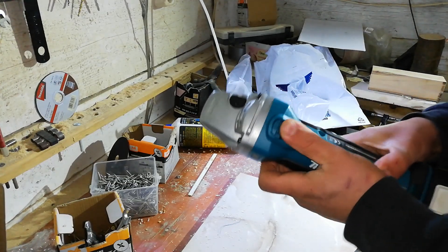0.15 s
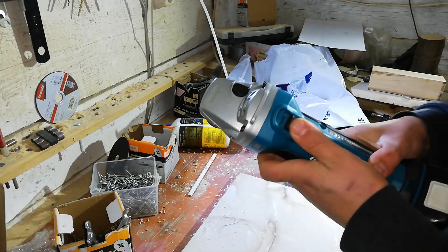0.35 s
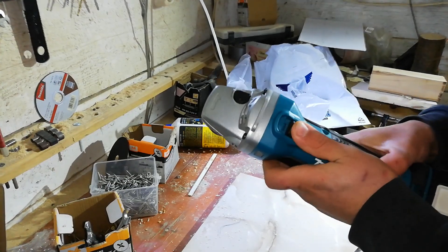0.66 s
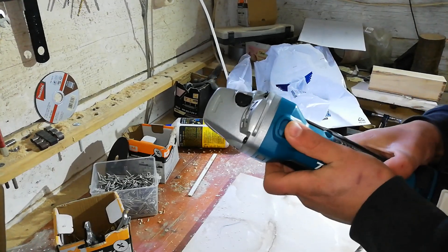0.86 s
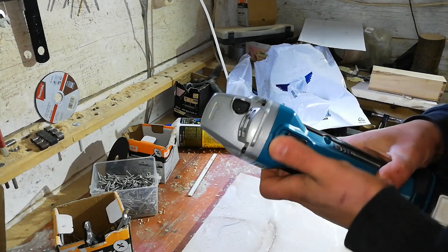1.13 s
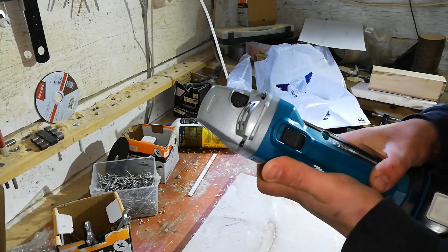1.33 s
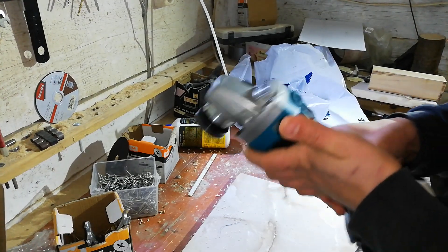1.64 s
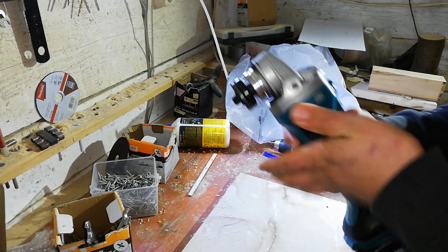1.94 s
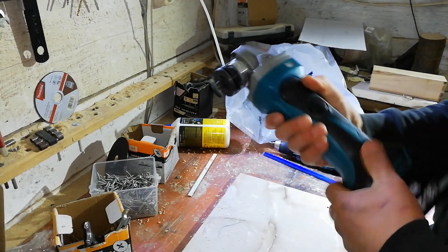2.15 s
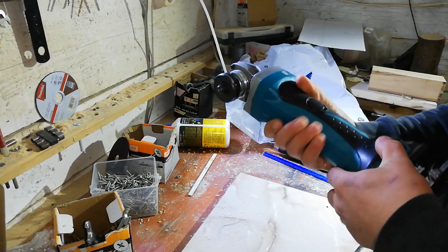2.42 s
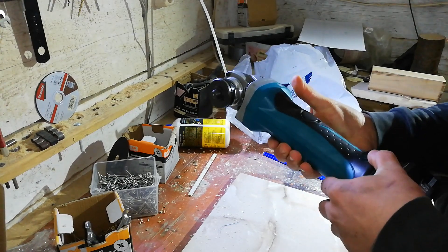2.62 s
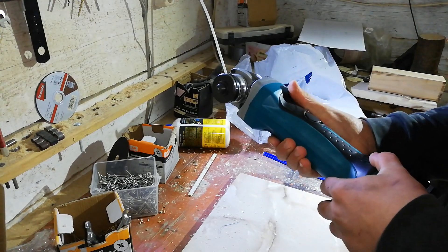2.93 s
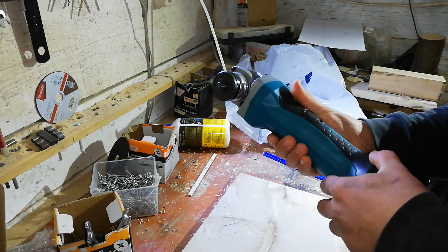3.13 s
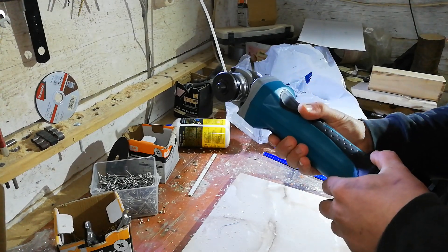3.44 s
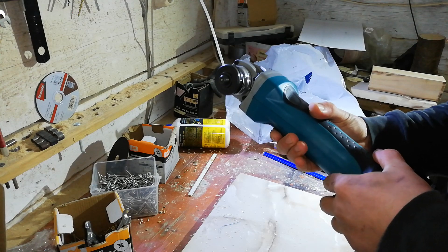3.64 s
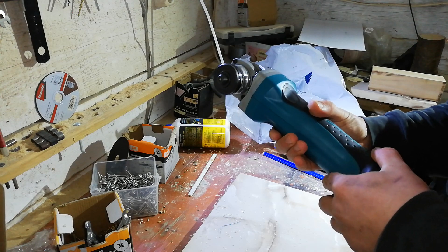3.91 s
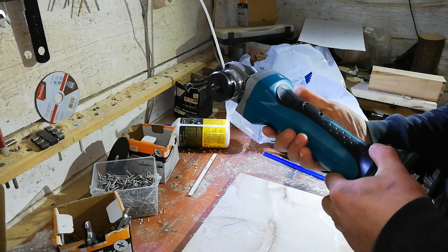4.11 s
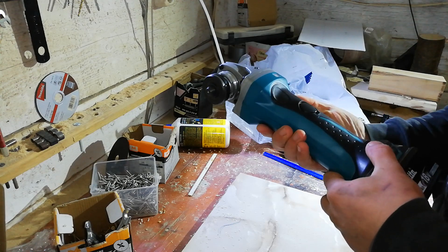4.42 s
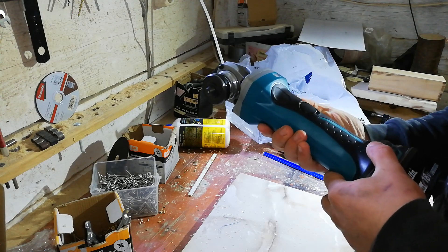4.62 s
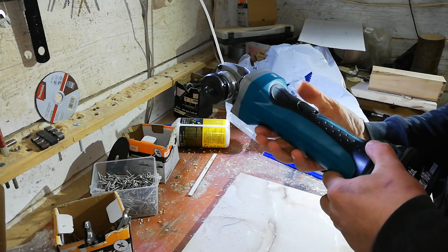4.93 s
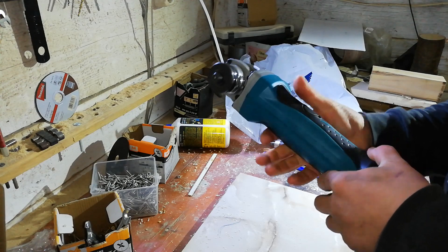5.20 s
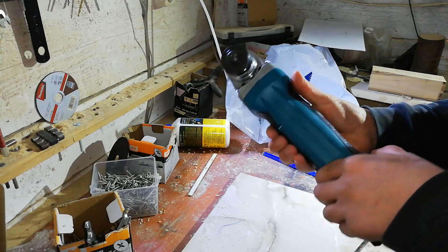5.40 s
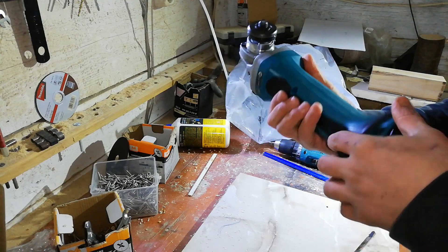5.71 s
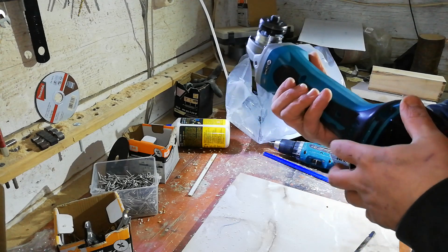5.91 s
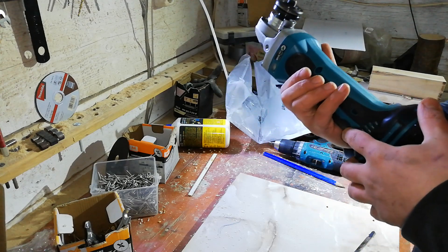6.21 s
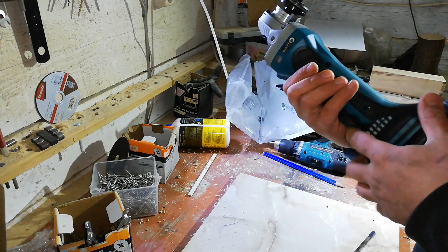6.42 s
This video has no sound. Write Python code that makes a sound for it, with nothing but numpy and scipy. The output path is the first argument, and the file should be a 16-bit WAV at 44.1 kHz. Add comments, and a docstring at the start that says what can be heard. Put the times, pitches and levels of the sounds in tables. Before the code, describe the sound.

A close stereo microphone in a small, cluttered, fairly dry workshop. At first there is only a very low room floor, with faint plastic ticks and soft skin rubs around 0.2-0.4 and again near 0.75 seconds. At 0.8 a sharp, loud switch snap; at 0.9 a short rough electric buzz, and a cordless angle grinder without a disc spins up, its strained gears chirping and screeching upward until about 1.3. It then runs steadily, a bright harsh gear rattle with hum, high whines and fan air; between 1.6 and 2.4 its colour shifts as it is turned over, the hum receding and whine coming forward. Small hard knocks poke through. At 4.86 the switch snaps off. Brief squeals glide down, air fades quickly, and the rattle separates into slower, duller pulses and scraping, ending at 6.2 with a tiny tick and faint metallic ring. Quiet follows, with a faint handling rub and tick near 6.5.

```python
"""A thumb feels for a slide switch in the quiet of a small workshop: ticks in the slot, skin rubbing on plastic.
The switch snaps on, the soft start buzzes and a cordless angle grinder without a disc spins up over a bench.
It whines and is turned over in the hands; bevel gears rattle in the metal head and the fan blows.
Switched off, it coasts to a stop. Filtered noise makes the rattle, air, rubs and clicks; sines that follow
the motor's turns make the hum, the whines, the squeals and the blade tone."""
import sys
import numpy as np
from scipy import signal
from scipy.fft import rfft, irfft, next_fast_len
from scipy.io import wavfile
from scipy.ndimage import uniform_filter1d, map_coordinates

SR = 44100
rng = np.random.default_rng(int(sys.argv[2]) if len(sys.argv) > 2 else 0)


def waveform_to_disk(signal):
    """Save audio, clipped to [-1, 1], as 16-bit WAV at the path in sys.argv[1]."""
    frames = np.transpose(np.atleast_2d(signal))
    scaled = np.clip(frames, -1, 1) * 32767
    samples = np.round(scaled).astype(np.int16)
    wavfile.write(sys.argv[1], SR, samples)


N = 288847

TEETH = 19  # on the motor pinion
GEAR_RATIO = TEETH / 39  # spindle turns for each motor turn
BLADES = 7  # on the fan
FULL_HZ = 327.2  # full speed, motor turns a second
ON_S, SOFT_END_S, OFF_S = .9, 1.03, 4.86  # power on, soft start over, power off

# Likeness of left and right at the microphones. Each row: frequency in Hz, likeness (1 = the same).
ALIKE = [(100, 1), (300, 0.98), (550, 0.89), (1000, 0.46), (2000, 0.83), (4000, 0.44), (9000, 0.074)]
# Resonances of the metal gear head. Each row: centre in Hz, width in Hz, lift in dB.
HEAD = [(1203.5, 20, 9), (1320, 35, 2.5), (1546, 410, 2), (2375, 40, 2.5), (2964, 97, 2.5), (3640, 120, 0),
        (3800, 410, 3), (4830, 800, 3.5), (5430, 80, 6), (8240, 330, 1), (9710, 330, 2.5)]
# Colour of the switch and its housing. Each row: frequency in Hz, relative level in dB.
SWITCH_COLOUR = [(180, -70.5), (300, -42), (526, -50), (922, -19), (1180, -18), (1640, -20), (3280, -12.5),
                 (4200, -16), (5500, -12.5), (6360, -15), (8280, -5.5), (10600, -7.5), (12500, -35),
                 (15500, -35.5)]
# The gears' last tick as they stop. Each row: time in seconds, envelope peak in dB, 60 dB decay in seconds.
LAST_TICK = [(6.2128, -49, .018)]


def amp(db):
    """Decibels to gain."""
    return 10 ** (np.asarray(db) / 20)


def unit(x):
    """x at rms 1."""
    return x / np.sqrt(np.mean(x ** 2) + 1e-20)


def along(points, hz):
    """Values between (Hz, value) points on a log frequency axis."""
    f, v = np.transpose(points)
    return np.interp(np.log(hz + 1), np.log(f + 1), v)


def clock():
    """The time of every sample, in seconds."""
    return np.arange(N) / SR


def curves(rows):
    """One value per sample for each column after the time."""
    s, *cols = np.transpose(rows)
    return [np.interp(clock(), s, c) for c in cols]


def ramp(start, end):
    """0 before start, 1 after end, straight between."""
    return np.clip((clock() - start) / max(end - start, 1 / SR), 0, 1)


def swell(s, length):
    """A smooth rise and fall around time s."""
    return np.exp(-((clock() - s) / length) ** 2)


def strikes(rows):
    """Envelope of sharp contacts that die away, from rows of seconds, peak dB and 60 dB decay in seconds."""
    return sum((clock() >= s) * amp(db - 60 * np.abs(clock() - s) / decay) for s, db, decay in rows)


def wobble(rate):
    """A smooth random curve, rate knots a second."""
    t = clock()
    coarse = t[::32]
    knots = rng.standard_normal(int(N * rate / SR) + 4)
    return np.interp(t, coarse, map_coordinates(knots, [coarse * rate], order=2))


def lift_db(resonances, hz):
    """The lift in dB that a body's resonances give at hz."""
    return sum(db / (1 + (2 * (hz - centre) / width) ** 2) for centre, width, db in resonances)


def filtered(x, response):
    """x times a response of frequency."""
    m = next_fast_len(N + SR // 2)
    return irfft(rfft(x, m) * response(np.fft.rfftfreq(m, 1 / SR)), m)[..., :N]


def coloured(x, colour_db):
    """Causal minimum-phase filter whose shape in dB is a function of frequency, scaled to unit power."""
    size = 4096
    gain = unit(amp(colour_db(np.fft.rfftfreq(size, 1 / SR))))
    cepstrum = irfft(np.log(gain + 1e-6))
    # fold the cepstrum forwards in time so that nothing sounds early
    cepstrum[1:size // 2] *= 2
    cepstrum[size // 2 + 1:] = 0
    impulse = irfft(np.exp(rfft(cepstrum)))
    return signal.fftconvolve(x, impulse[None], axes=1)[:, :N]


def noise(alike):
    """White stereo noise with the given likeness of left and right."""
    def mid_side_gains(hz):
        turn = np.arccos(np.clip(along(alike, hz), -1, 1)) / 2
        return np.array([np.cos(turn), np.sin(turn)])

    mid, side = filtered(rng.standard_normal((2, N)), mid_side_gains)
    return unit(np.array([mid + side, mid - side]))


def patchy(x, depth_db, flares=()):
    """Moving the tool shifts the bench's reflections: patches of gain drift over the spectrum, some bands flare."""
    hz, t, z = signal.stft(x, SR, nperseg=512)
    field = uniform_filter1d(rng.standard_normal(z.shape), size=4, axis=1)
    field = uniform_filter1d(field, size=36, axis=2)
    flare_db = sum(np.outer(lift_db([band], hz), np.exp(-((t - s) / length) ** 2))
                   for s, length, *band in flares)
    return signal.istft(z * amp(depth_db * unit(field) + flare_db), nperseg=512)[1][:, :N]


def tone(turns, multiple, flutter_db, blur):
    """One shaft order; it flutters, and the higher it is, the more its phase drifts between the ears."""
    phase = 2 * np.pi * (multiple * turns + rng.random()) + blur * wobble(70)
    apart = .09 * np.sqrt(multiple) * wobble(2)
    size = amp(flutter_db * (wobble(5.59) / 4 + wobble(35)))
    return np.sqrt(2) * size * np.sin([phase + apart, phase - apart])


def direct_tone(turns, multiple, flutter_db, blur, rate=110):
    """One shaft order that reaches both ears alike; it flutters in strength and phase."""
    phase = 2 * np.pi * (multiple * turns + rng.random()) + blur * wobble(rate)
    return np.sqrt(2) * amp(flutter_db * wobble(30)) * np.sin(phase)


def quiet_room():
    """The low floor of the idle workshop: steady noise, alike in both microphones only in the bass."""
    # Each row: frequency in Hz, likeness of left and right.
    still = [(40, .999), (120, 0.95), (300, 0.66), (1000, 0.36), (5000, .1)]
    # Colour of the quiet. Each row: frequency in Hz, relative level in dB.
    quiet = [(20, -7.5), (65, -13), (130, -15), (260, -23), (500, -28), (1300, -25.5), (2300, -28.5),
             (6000, -31.5), (9400, -29), (12400, -39), (15500, -45)]
    return amp(-63.0) * coloured(noise(still), lambda hz: along(quiet, hz))


def workshop(x, wet_db, t60):
    """x with the short answer of a cluttered room: a decaying noise tail for each side."""
    t = np.arange(SR // 3) / SR
    tail = rng.standard_normal((2, len(t))) * amp(-60 * t / t60) * (t > .002)
    tail /= np.linalg.norm(tail, axis=1, keepdims=True)
    return x + amp(wet_db) * signal.fftconvolve(x, tail, axes=1)[:, :N]


def ports(hz):
    """The small tool radiates little bass, and reaches the two microphones at different strengths and phases."""
    # Each row: frequency in Hz, left minus right in dB.
    lean = [(60, -3), (92, -0.5), (140, 2), (210, -0.5), (330, -1), (500, -10), (770, -1.5), (1170, 1),
            (1790, 2), (2740, -2.5), (4190, -0.5), (6410, 1.5), (9810, 3), (15000, -1)]
    # Each row: frequency in Hz, radians by which left leads.
    lead = [(170, 0), (330, -1.1), (690, -2.5), (950, -6), (2580, -7.5), (3790, -6.5), (4910, -12.5),
            (5940, -11.5), (6980, -22), (8350, -19.5), (8790, -22), (12500, -27), (15800, -32)]
    half = amp(along(lean, hz) / 2) * np.exp(.5j * along(lead, hz))
    return np.array([half, 1 / half]) * hz ** 2 / (hz ** 2 + 70 ** 2)


def thumb():
    """The thumb nudges the slider, which ticks in its slot, and rubs the housing in small slips."""
    slip_db, slip_rate = 3, 400  # depth of catch and slip in dB, random knots a second
    # Slider ticks. Each row: time in seconds, envelope peak in dB, 60 dB decay in seconds.
    tick_rows = [(.16, -59, 0.14), (.225, -56, 0.033), (.2285, -42, 0.02), (.3472, -45.5, 0.029),
                 (.358, -57, 0.088), (.7598, -45.5, .06), (6.49, -58, .1)]
    # Skin sliding on the housing. Each row: time in seconds, half-length in seconds, swell peak in dB.
    rubs = [(.29, 0.078, -71), (0.414, 0.024, -51), (0.708, 0.079, -67), (0.766, 0.02, -58.5),
            (6.5, .07, -65.5)]
    # Resonances of the slider. Each row: centre in Hz, width in Hz, lift in dB.
    slider = [(1250, 250, 5), (1650, 200, 5), (2380, 150, 10), (3760, 220, 7), (5600, 300, 6),
              (6300, 250, 4), (9900, 300, 4)]
    # Resonances of the plastic housing. Each row: centre in Hz, width in Hz, lift in dB.
    housing = [(2200, 300, 10), (4330, 400, 13), (7360, 200, 3), (9600, 600, 8)]
    ticks = coloured(strikes(tick_rows) * noise(ALIKE),
                     lambda hz: along(SWITCH_COLOUR, hz) + lift_db(slider, hz))
    slips = unit(amp(slip_db * wobble(slip_rate)))
    force = sum(amp(db) * swell(s, length) for s, length, db in rubs) * slips
    return ticks + coloured(force * noise(ALIKE), lambda hz: along(SWITCH_COLOUR, hz) + lift_db(housing, hz))


def switch():
    """The slide switch gives, snaps on and later snaps off: sharp bursts of coloured noise."""
    # Each row: time in seconds, envelope peak in dB, 60 dB decay in seconds.
    snaps = [(.797, -41.5, 0.0085), (.8005, -4.5, 0.0045), (4.8635, -10, 0.014)]
    return coloured(strikes(snaps) * noise(ALIKE), lambda hz: along(SWITCH_COLOUR, hz))


def soft_start():
    """The chopped current makes the windings buzz, ever duller, and the rotor kicks roughly as it gets going."""
    chop_hz, dull_hz = 497, 1000  # pulses a second, cutoff of the dulled buzz
    # Each row: frequency in Hz, relative level in dB.
    buzz_colour = [(150, -38), (330, -13.5), (500, -9.5), (1000, -12), (1500, -17), (2000, -13),
                   (3000, -24), (5000, -29), (9000, -25.5), (14000, -58.5)]
    pulses = np.diff(np.floor(clock() * chop_hz + .025 * wobble(250)), prepend=0)
    pulses = unit(pulses - pulses.mean())
    dull = filtered(pulses, lambda hz: 1 / (1 + (hz / dull_hz) ** 4))
    dulling = ramp(ON_S + .012, ON_S + .05)
    pulses = (1 - dulling) * pulses + dulling * dull
    powered = ramp(ON_S - .002, ON_S)
    buzz = amp(-26.5) * pulses * powered * (1 - ramp(ON_S + .035, ON_S + .105))
    kick = amp(-30) * noise(ALIKE) * powered * swell(ON_S + .04, .035)
    return coloured(buzz + kick, lambda hz: along(buzz_colour, hz))


def motor_speed():
    """Turns a second: a straight soft start, an easing approach to full speed, then drag and friction stop it."""
    soft_end_hz, spin_up_s = 222, .128  # speed as the soft start ends, time constant of the approach
    drag_s, friction_hz_per_s = 1.305, 142  # drag time constant, turns a second lost each second
    t = clock()
    missing = (FULL_HZ - soft_end_hz) * np.exp(-np.maximum(t - SOFT_END_S, 0) / spin_up_s)
    driven = ramp(ON_S, SOFT_END_S) * (FULL_HZ - missing)
    friction = friction_hz_per_s * drag_s
    coasting = (FULL_HZ + friction) * np.exp(-np.maximum(t - OFF_S, 0) / drag_s) - friction
    return np.maximum(np.minimum(driven, coasting), 0)


def strain():
    """Load on the teeth while the motor accelerates, 0-1: it builds up, then eases."""
    build_s, ease_s = .075, .21
    return ramp(ON_S, ON_S + build_s) ** 2 * np.exp(-np.maximum(clock() - SOFT_END_S, 0) / ease_s)


def tilt_db(multiple):
    """How much the tilt of the tool in the hands favours one order."""
    # Each row: time in seconds, half-length in seconds, multiple of the motor speed, lift (or dip) in dB.
    tilts = [(1.62, .12, 3, 4), (1.62, .1, 5, 4), (1.75, .2, 2, 7), (1.55, .25, 14, 8), (1.75, .12, 15, 7),
             (2.5, .25, 2, 2), (2.85, .13, 9, 6), (3.48, .17, 5, 7), (1.65, .15, 7, 5), (2.1, .1, 7, 4),
             (2.7, .25, 7, 5), (3.3, .25, 7, -8), (3.76, .05, 7, 7), (3.62, .03, 9, 7), (3.95, .25, 14, 5),
             (4.5, .25, 15, 3), (4.72, .12, 9, 4)]
    return sum(db * swell(s, length) for s, length, k, db in tilts if k == multiple)


def fan(speed):
    """Cooling air dies away quickly with the speed; the bearings rasp on until the gears' last tick."""
    air_db, air_power = -29.5, 1.9  # gain at full speed, power of speed
    bearing_db, bearing_power = -37.5, 0.17
    # Each row: frequency in Hz, relative level in dB.
    air_colour = [(30, -67), (80, -45.5), (130, -21.5), (210, -16.5), (300, -10), (420, -11), (800, -3),
                  (1500, -5.5), (2600, -1), (4000, -7), (9000, -5.5), (11200, -28), (15000, -38.5)]
    pace = speed / FULL_HZ
    air = amp(air_db) * pace ** air_power
    bearings = amp(bearing_db) * pace ** bearing_power * np.tanh(speed / 8)
    rush = patchy(noise(ALIKE), depth_db=2)
    return coloured(rush * (np.hypot(air, bearings) + strikes(LAST_TICK)),
                    lambda hz: along(air_colour, hz) + lift_db(HEAD, hz))


def blades(speed, turns):
    """The fan-blade tone and its overtones swell each time they glide through a resonance of the vents."""
    base_db, drift_db = -58, .8  # level away from resonances, depth of a slow drift
    low_hz = 290  # below this pitch it radiates poorly
    # Overtones. Each row: multiple of the blade rate, dB against the blade tone.
    overtones = [(2, -15), (3, -15)]
    # Resonances of fan chamber and vents. Each row: centre in Hz, width in Hz, lift (or dip) in dB.
    vents = [(295, 50, 7), (385, 110, 11.5), (490, 130, 7.5), (640, 70, -5), (770, 120, 16.5),
             (1010, 130, 8), (1300, 260, 11.5), (2260, 440, 17)]
    out = np.zeros(N)
    for k, db in [(1, 0.0034)] + overtones:
        hz = k * BLADES * speed
        radiated = hz ** 4 / (hz ** 4 + low_hz ** 4)
        level_db = base_db + db + lift_db(vents, hz) + tilt_db(k * BLADES) + drift_db * wobble(4)
        out += amp(level_db) * radiated * direct_tone(turns, k * BLADES, flutter_db=2.4, blur=.2)
    return out


def whine(speed, turns):
    """Unbalance hum and the orders of both shafts; all fade steeply as the motor slows, the spindle's fastest."""
    hum_db, hum_facing_db, hum_power = -47.8, 8.5, 3.2  # base, extra before the turn-over, power of speed
    # Whine of the motor shaft. Each row: multiple of its speed, full-speed level in dB before tilt and facing.
    motor_orders = [(2, -41), (3, -40.5), (4, -54), (5, -42.5), (9, -41.5), (12, -36.5), (14, -39.5),
                    (15, -36), (18, -40.5), (20, -42), (28, -34.5)]
    # Whine of the geared-down spindle. Each row: multiple of its speed, full-speed level in dB.
    spindle_orders = [(1, -58.5), (3, -53.5), (8, -55), (22, -48), (24, -43.5), (35, -43), (40, -42),
                      (52, -42)]
    # Hand-held body, shaken by the unbalance. Each row: centre in Hz, width in Hz, lift (or dip) in dB.
    body = [(140, 40, 10), (180, 22, -14), (213, 34, 13), (293, 34, 11)]
    pace = speed / FULL_HZ
    unturned = 1 - ramp(2.08, 2.42)  # the tool is turned over in the hands
    rung_up = 1 - strain() ** 2  # a fast sweep gives the body no time to resonate
    hum = amp(hum_db + hum_facing_db * unturned + rung_up * lift_db(body, speed)) * pace ** hum_power
    hum = hum * (1 - 0.75 * strain() ** 2) * tone(turns, 1, flutter_db=1.7, blur=0.037)
    motor = sum(amp(db + tilt_db(k)) * pace ** min(1.55 * k, 3.5)
                * tone(turns, k, flutter_db=2.4, blur=.03 * k) for k, db in motor_orders)
    spindle = sum(amp(db) * tone(turns * GEAR_RATIO, k, flutter_db=1, blur=0.25) for k, db in spindle_orders)
    facing = amp(-0.5 - 6.9 * unturned)  # the vents turn towards the listener
    return hum + facing * motor + pace ** 4.1 * spindle


def squeals(speed, turns):
    """Strained teeth chirp, then screech through gear resonances; other orders squeal briefly; all throb each turn."""
    mesh_db = -40.5  # tooth-mesh whine under full strain, away from resonances
    # Loaded gear pair. Each row: centre in Hz, width in Hz, lift in dB.
    gear_modes = [(2480, 300, 8.5), (3080, 400, 10.5), (3850, 300, 13), (4720, 380, 21), (5220, 300, 16.5)]
    # Each row: time in seconds, half-length in seconds, multiple of the motor speed, level in dB before throb.
    brief_orders = [(1.085, .02, 28, -28), (1.19, .03, 20, -32), (1.21, .03, 9, -33), (1.28, .03, 19, -35),
                    (4.97, .045, 9, -31.5), (4.975, .04, 5, -39), (4.97, .08, 2, -40), (4.92, .03, 7, -37),
                    (5.01, .04, 14, -35), (5.12, .03, 5, -45), (4.95, .04, 3, -43), (5.22, .14, 2, -49),
                    (5.05, .06, 28, -29.5), (5.21, .06, 28, -39), (5.3, .15, 15, -47), (5.4, .035, 42, -38),
                    (5.56, .09, 21, -44)]
    shudder = .25 + .12 * ramp(1.0, SOFT_END_S)
    mesh = amp(mesh_db + lift_db(gear_modes, TEETH * speed)) * strain()
    mesh = mesh * direct_tone(turns, TEETH, flutter_db=2, blur=shudder, rate=300)
    brief = sum(amp(db) * swell(s, length) * direct_tone(turns, k, flutter_db=1.5, blur=.25)
                for s, length, k, db in brief_orders)
    throb = np.cos(2 * np.pi * turns)
    return mesh * (1 + .85 * throb) + brief * (1 + .4 * throb)


def settle():
    """The gears drop into their last tooth gap and the head rings faintly."""
    # Each row: frequency in Hz, level in dB, 60 dB decay in seconds.
    modes = [(1510, -62, .05), (3180, -64, 0.11), (3430, -63, .08), (4936, -63, .15)]
    t = np.maximum(clock() - LAST_TICK[0][0], 0)
    return sum(amp(db - 60 * t / t60) * np.sin(2 * np.pi * hz * t) for hz, db, t60 in modes)


def rattle_level(speed):
    """The rattle grows with speed and strain, and is softer once the power is off."""
    gain_db, strain_db, coast_db = -0.5, 9.7, -22.5  # under power, extra at full strain, base level coasting
    power, coast_power, knee_hz = 0.12, 0.18, 54.3  # power of speed, further power unpowered, dying below
    slacken_s = 0.094  # the teeth go slack this fast after the power is cut
    # Rattle before the gain above. Each row: time in seconds, level in dB.
    level_rows = [(1.45, -24), (1.7, -22.5), (1.95, -23), (1.98, -21.5), (2.29, -20.5), (2.39, -19.5),
                  (3.35, -20), (4.73, -19.5), (4.8, -18.5)]
    powered_db = curves(level_rows)[0] + gain_db + strain_db * strain()
    slack = ramp(OFF_S, OFF_S + slacken_s)
    level_db = (1 - slack) * powered_db + slack * coast_db
    growth = (speed / FULL_HZ) ** (power + slack * coast_power)
    return amp(level_db) * growth * speed / np.hypot(speed, knee_hz)


def knocks(turns, swing_db, scatter_db):
    """Envelope of tooth contacts of very uneven force, each ringing briefly, against their local mean power."""
    ring_s = .00055  # time constant of the power
    at = np.flatnonzero(np.diff(np.floor(TEETH * turns)) > 0)
    power = np.zeros(N)
    uneven_db = scatter_db[at] * np.minimum(rng.standard_normal(len(at)), 2)
    power[at] = amp(swing_db[at] + uneven_db) ** 2
    power = signal.lfilter([1], [1, -np.exp(-1 / (ring_s * SR))], power)
    mean = uniform_filter1d(uniform_filter1d(power, size=1500), size=1500)
    return np.sqrt(power / (np.abs(mean) + 1e-6))


def gears(speed, turns):
    """The unloaded teeth rattle hardest once a spindle turn; slowing, the bursts separate and grow duller."""
    tight_s, lurch_db = 5.68, 1.3  # the spindle passes its tight spot, swing of the slow rattle each turn
    # Colours under strain, at speed, coasting and rolling. Each row: frequency in Hz, relative level in dB.
    pulling = [(880, -45.5), (1500, -14.5), (1810, -17.5), (2170, -12), (2750, -8), (3310, -15),
               (3910, -7.5), (4310, -3.5), (4940, -3), (6820, -10.5), (9600, 3.5), (11900, -21),
               (13800, -23), (15500, -46.5)]
    running = [(880, -44), (1500, -14), (1590, -24), (2030, -10), (2860, -3), (3340, -4), (3800, -0.5),
               (4230, -2), (4750, -3), (5900, -3.5), (7000, -3.5), (7500, -3.5), (9510, 4), (11000, -9.5),
               (13900, -17.5), (15500, -40)]
    coasting_colour = [(590, -70), (1000, -33), (1290, -12.5), (1410, -18.5), (2060, -15), (3300, -8.5),
                       (3830, -0.5), (4190, -8), (4900, -11.5), (5500, -8), (6190, -15.5), (7400, -7),
                       (9400, -2), (10000, -4.5), (10700, -15.5), (11500, -27), (14300, -29), (15500, -68)]
    rolling_colour = [(590, -29), (1000, -15), (1500, -10.5), (2060, -7), (3300, -14.5), (3800, -2.5),
                      (4190, -3.5), (5400, -7.5), (6300, -16), (8600, 1), (9500, 0.5), (10100, -3),
                      (11200, -29), (15500, -73)]
    # Head ringing once the teeth only roll and scrape. Each row: centre in Hz, width in Hz, lift in dB.
    scrape_ring = [(1520, 120, 6), (2000, 120, 3), (2450, 90, 7), (2930, 110, 4), (3640, 110, 9),
                   (4160, 90, 4), (4880, 130, 1), (8810, 150, 6)]
    # Bands that ring out or sink. Each row: time in seconds, half-length in seconds, Hz, width in Hz, lift in dB.
    flare_rows = [(1.03, .022, 3850, 400, 6), (.99, .03, 4900, 900, -3), (1.3, .15, 6000, 500, 4),
                  (1.65, .13, 1200, 1100, 6), (1.65, .06, 5250, 500, -5), (1.98, .05, 3800, 800, 3),
                  (2.08, .07, 5100, 600, 4), (2.42, .15, 7300, 700, 3), (2.72, .12, 2600, 350, 7),
                  (3.1, .17, 2600, 400, -6), (2.8, .3, 8750, 350, 4), (5.33, .08, 5550, 500, 7),
                  (5.3, .15, 6300, 600, 4), (5.53, .08, 5400, 500, 5), (5.56, .07, 7300, 600, 6),
                  (5.62, .1, 2000, 450, 5), (5.66, .12, 2950, 500, -6), (5.82, .07, 9400, 700, -5),
                  (5.8, .15, 4900, 800, -3)]
    # Hard single tooth knocks. Each row: time in seconds, envelope peak in dB, 60 dB decay in seconds.
    clacks = [(1.1725, -11, .014), (1.4153, -14, .012), (1.5059, -12, .012), (1.7566, -13, .012),
              (2.0123, -11, .012), (2.0699, -13, .012), (2.5904, -13, .012), (2.6343, -13, .012),
              (2.9533, -13, .012), (3.0973, -14, .012), (3.3988, -15, .012), (4.0005, -14, .012),
              (4.7168, -14, .012), (5.1157, -16, .02), (5.3222, -18, .025), (5.5956, -19, .02),
              (5.615, -19, .02), (5.6769, -20, .035), (5.7238, -22, .04), (5.8216, -24, .06),
              (5.911, -26, .05), (5.9563, -24, .07), (6.129, -39, .05)]
    settled, coasting = ramp(1.2, 2.246), ramp(4.87, 5.15)
    rolling = ramp(5.55, 5.9)  # the teeth pass from bouncing to rolling
    loose, launching = ramp(1.0, 1.1), 1 - ramp(1.1, 1.25)
    tight = np.cos(2 * np.pi * (turns - turns[round(tight_s * SR)]) * GEAR_RATIO)
    spindle_swing = (5.2 - 2 * settled - .6 * coasting) * tight
    motor_swing = (1.4 + 5.2 * launching) * np.cos(2 * np.pi * turns)
    force = knocks(turns, loose * (spindle_swing + motor_swing), scatter_db=1.5 + 1.1 * loose)
    bouncing = np.clip(speed / 90, 0, 1)  # slow teeth roll and scrape instead of bouncing
    grit = unit(amp(2.5 * wobble(350)))
    force = np.sqrt(bouncing * force ** 2 + (1 - bouncing) * grit ** 2) * amp(lurch_db * rolling * tight)
    clatter = patchy(noise(ALIKE), depth_db=2.5, flares=flare_rows)
    contacts = clatter * np.hypot(force * rattle_level(speed), strikes(clacks))
    # each colour with its resonances and its share of the power
    states = [(pulling, HEAD, 1 - settled), (running, HEAD, settled * (1 - coasting)),
              (coasting_colour, HEAD, coasting * (1 - rolling)), (rolling_colour, HEAD + scrape_ring, rolling)]
    return sum(coloured(contacts * np.sqrt(share), lambda hz: along(colour, hz) + lift_db(ring, hz))
               for colour, ring, share in states)


def scene():
    """The grinder, close by, over the quiet of the workshop."""
    speed = motor_speed()
    turns = np.cumsum(speed) / SR
    clatter = workshop(gears(speed, turns) + fan(speed), wet_db=-7, t60=.16)
    tool = filtered(clatter + settle() + soft_start() + whine(speed, turns), ports)
    machine = tool + blades(speed, turns) + squeals(speed, turns)
    hand = workshop(switch() + thumb(), wet_db=-3.5, t60=0.12)
    return machine + hand + quiet_room()


def record(dry):
    """The microphone channel rounds off the highest peaks and keeps nothing above its band limit."""
    top_hz = 15600
    rounded = dry / (1 + np.abs(dry / .92) ** 6) ** (1 / 6)
    return filtered(rounded, lambda hz: hz < top_hz)


dry = scene()
out = record(dry)
waveform_to_disk(out)
```